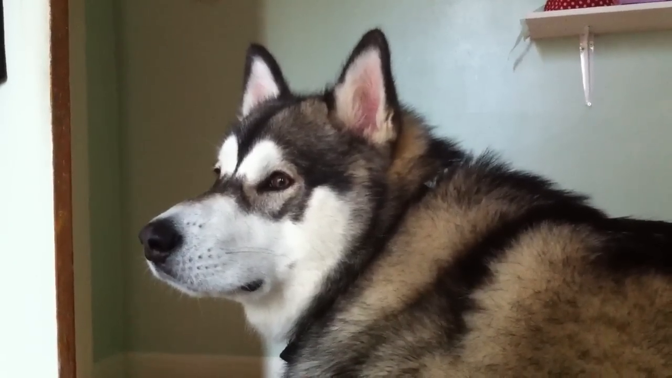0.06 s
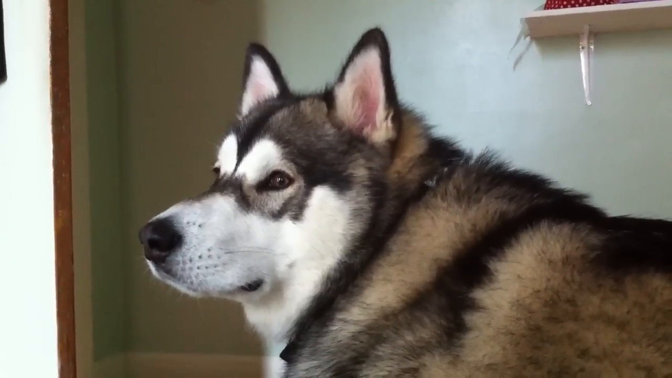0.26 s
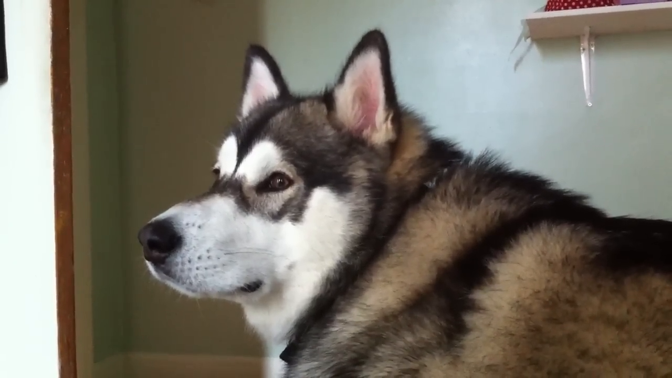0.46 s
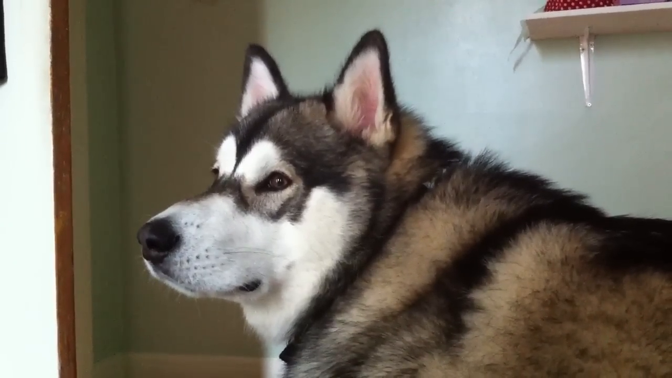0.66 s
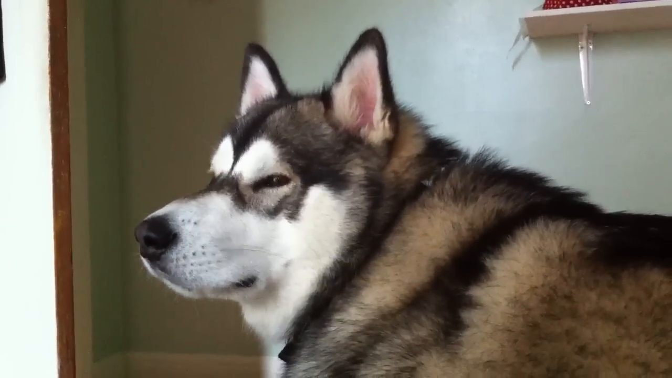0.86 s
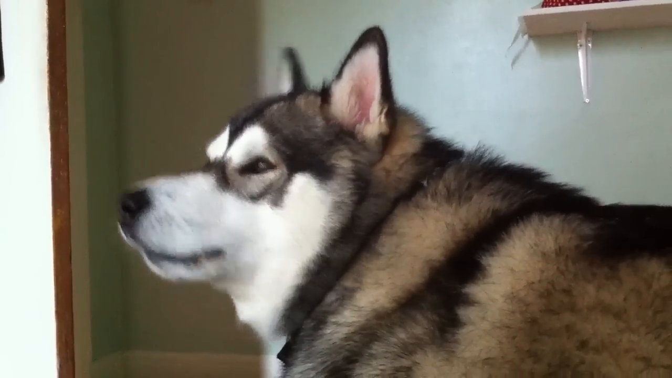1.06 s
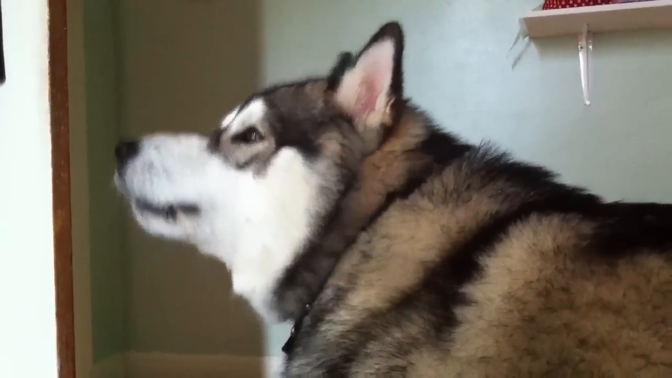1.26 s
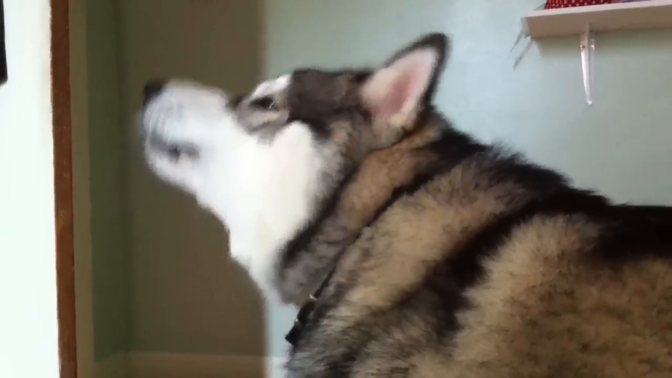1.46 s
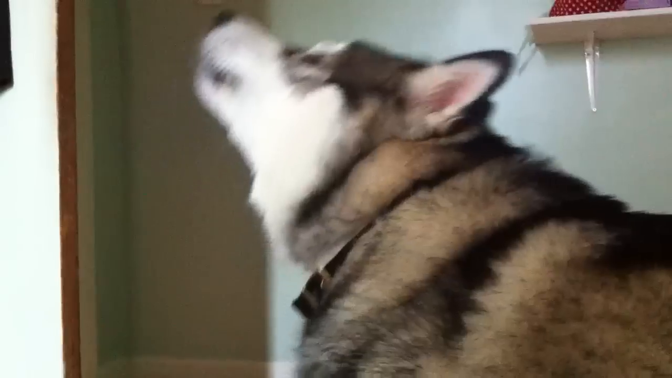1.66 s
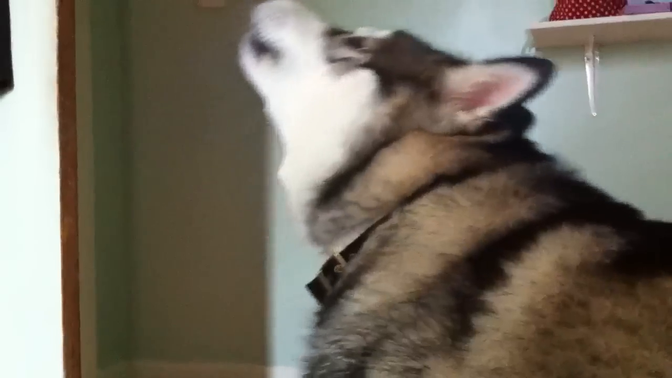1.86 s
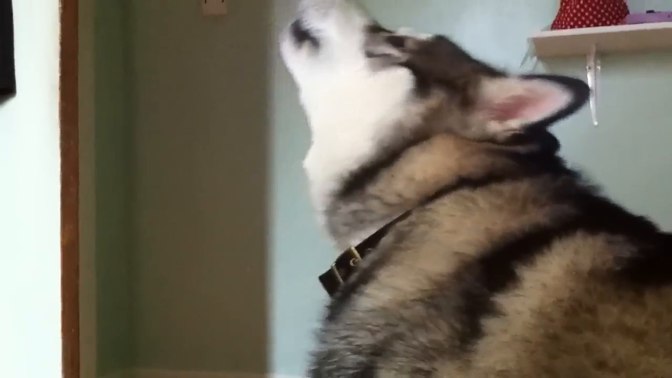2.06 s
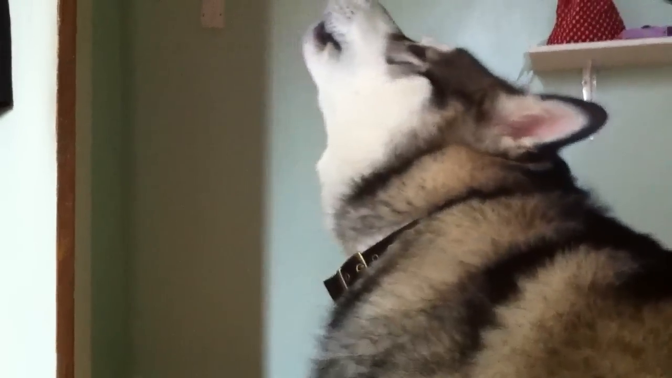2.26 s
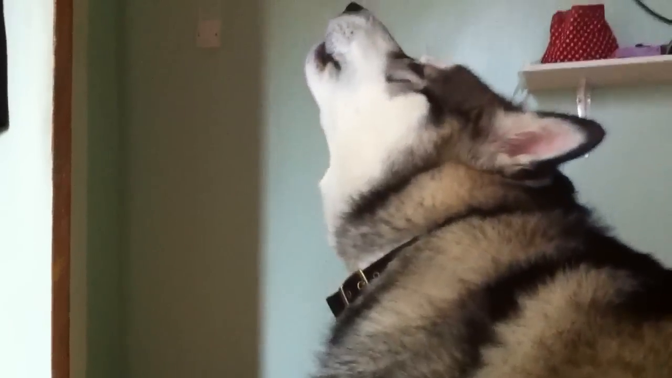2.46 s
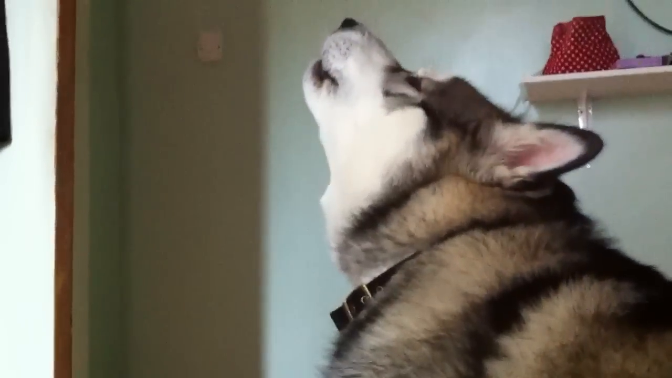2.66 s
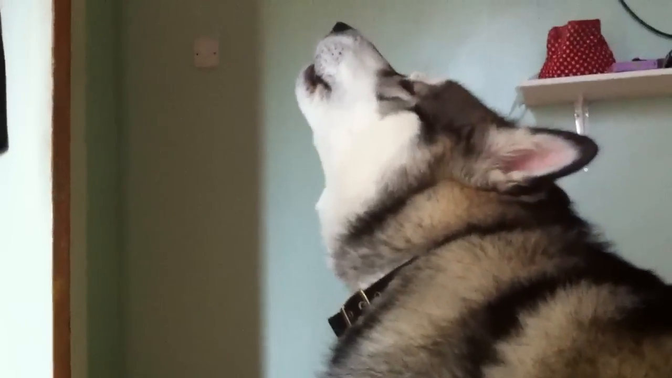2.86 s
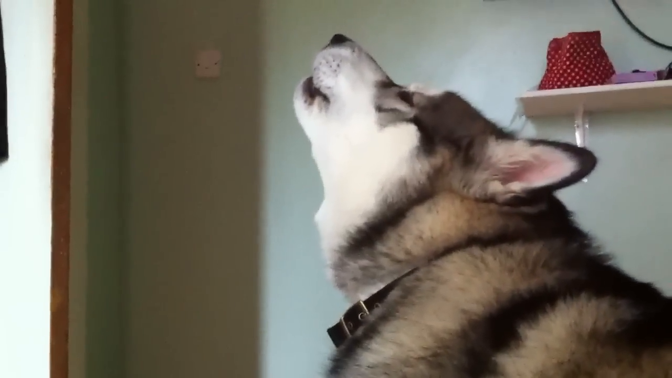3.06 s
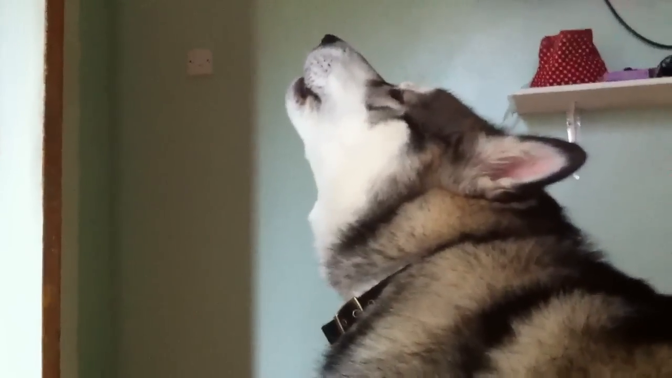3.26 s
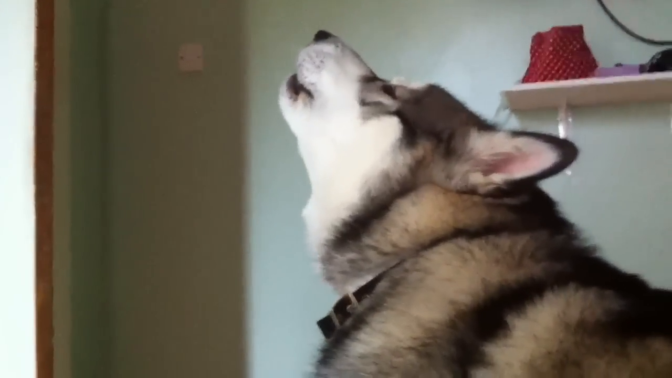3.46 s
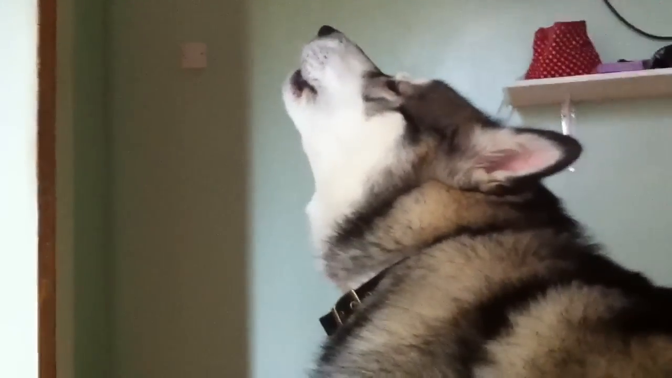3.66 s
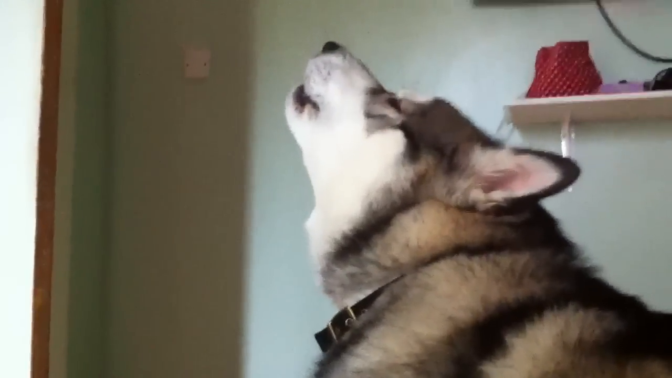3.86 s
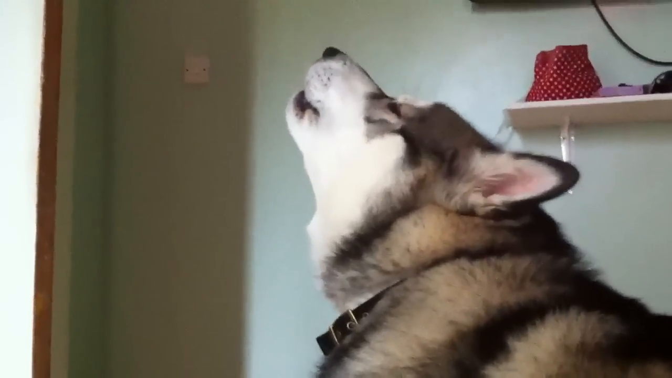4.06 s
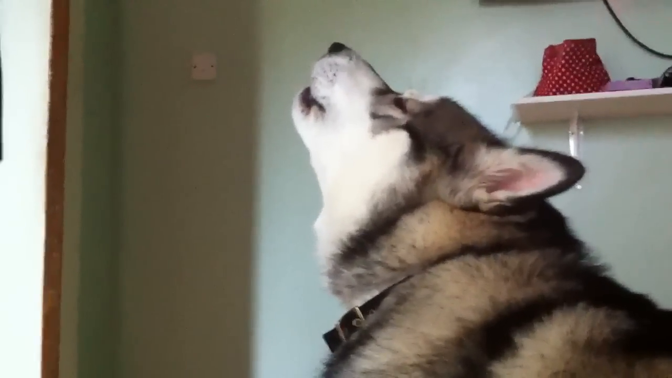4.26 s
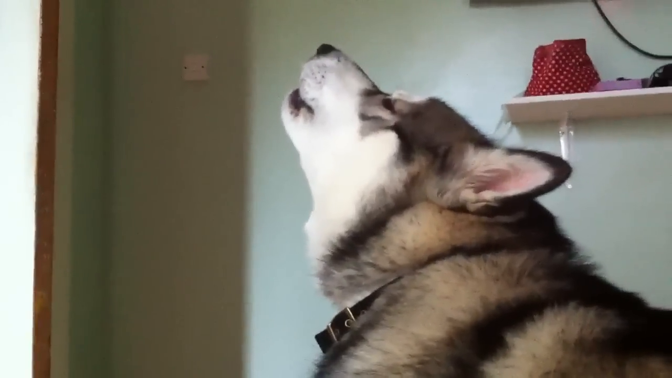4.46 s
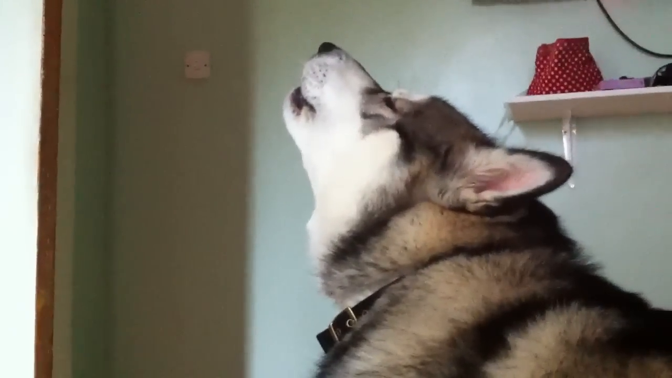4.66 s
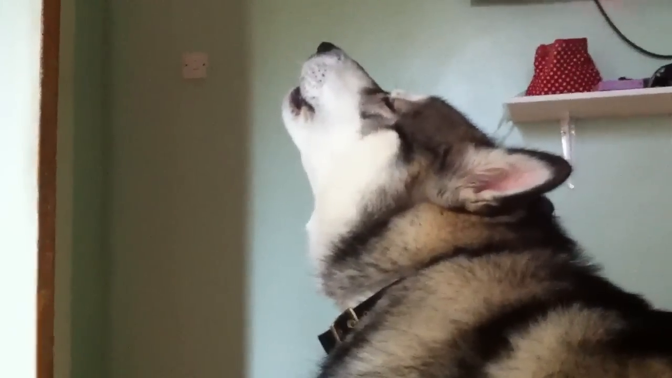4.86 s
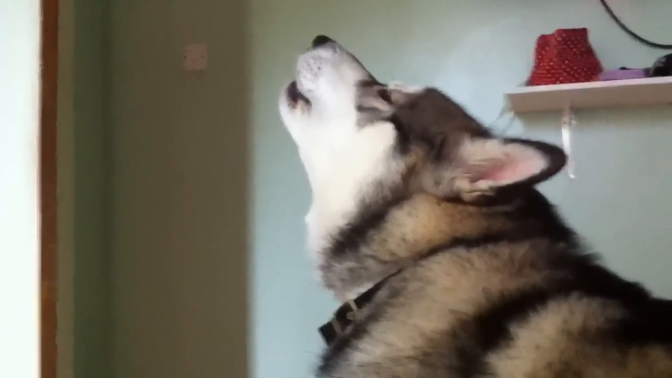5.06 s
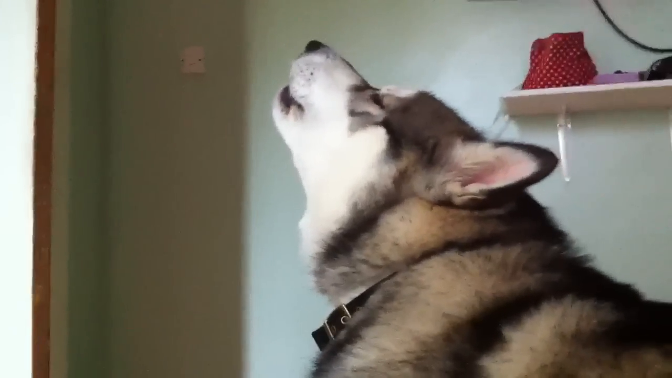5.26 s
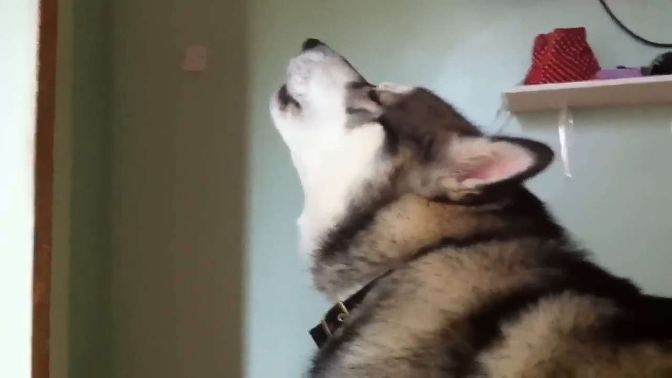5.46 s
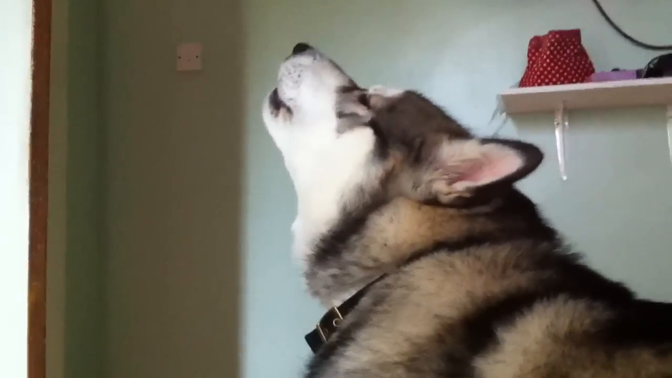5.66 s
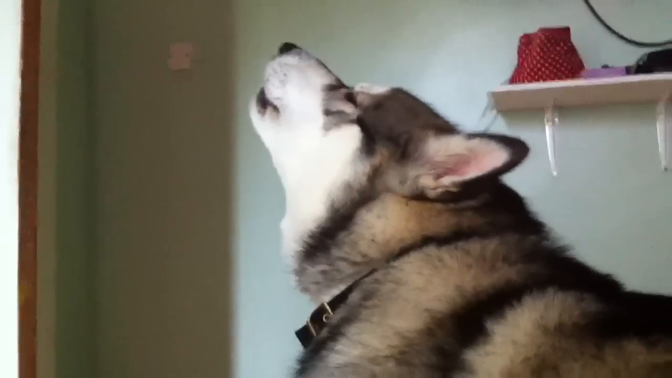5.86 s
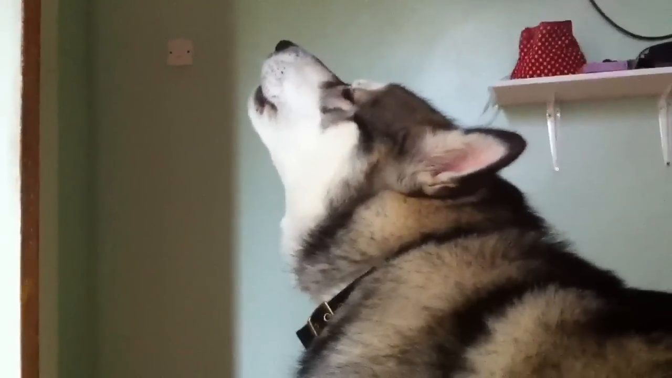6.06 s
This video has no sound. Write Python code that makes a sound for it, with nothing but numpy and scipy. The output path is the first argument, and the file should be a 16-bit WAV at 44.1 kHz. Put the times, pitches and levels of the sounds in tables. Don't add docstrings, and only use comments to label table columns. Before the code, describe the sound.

Close to the microphone in a small room, a large dog is quiet for a second, then smacks wet lips and gives a short creaky grunt. After a brief pause it howls once: a high tone swells, cracks down to a lower, rougher note, holds there with raspy flutters, then clears, slides down and fades. Breath rushes under the call; faint hiss and hum remain.

```python
import sys
import numpy as np
from scipy import signal
from scipy.fft import rfft, irfft
from scipy.io import wavfile
from scipy.ndimage import uniform_filter1d

SR = 44100
rng = np.random.default_rng(int(sys.argv[2]) if len(sys.argv) > 2 else 0)


def dump_mix(stems):
    frames = np.atleast_2d(stems).T
    limited = np.clip(frames, -1, 1)
    pcm = np.round(limited * 32767).astype(np.int16)
    wavfile.write(sys.argv[1], SR, pcm)


def volts_from_db(level):
    exponent = np.asarray(level, float) / 20
    return 10 ** exponent


N = 269451
TIME = np.arange(N) / SR

# [t/s, f/Hz]
HIGH_PITCH = [(1.48, 582.3), (1.51, 625.5), (1.53, 614.0), (1.638, 600.1), (1.72, 577.1), (1.902, 556.0),
              (2.102, 554.0), (2.34, 567.4), (2.485, 565.3)]
BREAK_PITCH = [(2.495, 480), (2.55, 462), (2.615, 448)]
LOCKED_PITCH = [(2.63, 423.5), (2.75, 422), (2.95, 407.8), (3.1, 406), (3.3, 408), (4.05, 407.3),
                (4.2, 406), (4.52, 406.4)]
SINKING_PITCH = [(4.59, 413.3), (4.95, 392.5), (5.27, 388), (5.36, 379), (5.64, 367.3), (5.72, 355),
                 (5.92, 346), (6.0, 336.5), (6.11, 334)]
# [t/s, level/dB, mouth opening/dB, throat squeeze/dB]
HIGH_EFFORT = [(1.47, -51, 7.5, -33), (1.49, -25, 9, -37), (1.58, -22.5, 14.5, -48), (1.635, -20, 7, -54),
               (1.68, -23.5, 10, -50), (1.75, -18, 0, -42), (1.97, -15, -6.5, -39.5),
               (2.1, -13.5, -7.5, -42), (2.38, -8.5, -18.5, -27.5)]
LOW_EFFORT = [(2.482, -11, -12, -34), (2.56, -10, -12.5, -25), (2.63, -13, 6, -28.5),
              (2.719, -15.5, 8.5, -26), (2.85, -11, 3, -29.5), (3.3, -12, 0.5, -25.5),
              (3.7, -10.5, -1.5, -28), (4.05, -10, 2, -21), (4.521, -10, 1, -26)]
SINKING_EFFORT = [(4.6, -8.5, 5, -27), (4.75, -10, 2, -31.5), (5.1, -12, 2.5, -40), (5.28, -15.5, 2.5, -38),
                  (5.45, -16.5, 1, -21.5), (5.64, -20, -0.5, -40), (5.72, -23.5, -5, -35),
                  (5.91, -23.5, -7, -37), (6.11, -38, 1.5, -23)]
# [f/Hz, level under the first harmonic/dB]
MOUTH = [(670, -9.5), (730, -16.5), (815, -17.5), (1000, -23.5), (1120, -11.5), (1220, -28.5),
         (1700, -19.5), (1850, -45.5)]
# [f/Hz, width/Hz, depth/dB]
CANCEL = [(335, 0.5, 6.5), (338.3, 1.5, 7.5), (358, 2.2, 2), (381, 3, 2), (401.4, 0.96, 2.5),
          (739, 9.7, 13), (795.6, 5, 19.5), (1163.4, 9.6, 7), (1213, 3.1, 18)]
# [t/s, level/dB]
LINGER = [(2.486, -32.5), (2.495, -25), (2.535, -27), (2.56, -20), (2.59, -30), (2.615, -29.5), (2.64, -53)]

# [t/s, its rate over the pitch]
LOCK = [
    (2.488, 1 / 2),
    (2.495, 3 / 5),
    (2.615, 7 / 11),
    (2.63, 2 / 3),
]
# [t/s, level/dB]
GRIP = [(2.27, -35), (2.33, -6), (2.48, -4), (2.65, -1), (3.4, 0), (4.53, 1.5), (4.63, -17), (4.75, -45.5)]
PARTNER_DB = [-36, -30, -24, -2]
# 1, 2, 3 and more pitches minus the line [level against their neighbours/dB]
WEAK_FAMILY_DB = [-32.5, -13.5, -6, -15]
# [t/s, depth/dB, length/ms]
SLIPS = [(2.493, 9, 4), (2.511, 18, 3.5), (2.523, 6, 2.8), (2.543, 17, 7), (2.562, 7, 7.2), (2.591, 22, 12),
         (2.614, 12, 14), (2.652, 9, 12), (3.04, 13, 5.5), (3.054, 7, 6.6), (3.101, 9, 4), (3.112, 20, 4),
         (3.128, 6, 6.5), (3.2, 18, 5.5), (3.27, 7, 4.9), (3.284, 6, 18), (3.336, 8, 4), (3.348, 16, 6.8),
         (3.362, 7, 5), (3.413, 18, 7.1), (3.432, 14, 5.6), (3.45, 16, 5.4), (3.465, 7, 5.6),
         (3.52, 26, 5.5), (3.535, 9, 5.8), (3.58, 18, 5.9), (3.601, 22, 6.6), (3.639, 6, 5.5),
         (3.677, 8, 11), (3.752, 16, 5.7)]
# [f/Hz, width/Hz, level/dB]
SLIP_RING = [(621, 29, -26), (766, 180, -33), (1080, 52, -30.5)]
# [from t/s, to t/s, jitter 0-1, rasp under the voice/dB]
STRAIN = [
    (1.444, 1.548, 0.3, -53),
    (2.478, 2.613, 0.27, -15.5),
    (3.008, 3.828, 0.15, -15.5),
]
STRAIN_RISE_S = [0.023, 0.021, 0.43]
STRAIN_FALL_S = [0.041, 0.04, 0.42]
# [f/Hz, width/Hz, level/dB]
RASP = [(286, 28, -10), (450, 160, -2.5), (658, 160, -6), (976, 200, -8.5), (1316, 13, -12),
        (1575, 140, -25), (2030, 160, -24)]

# [t/s, level/dB]
EDGE = [(1.5, -0.5), (1.75, -0.5), (2.0, -5.5), (2.3, 0), (2.55, -5.5), (2.93, -7), (3.02, -0.5), (4.6, 2),
        (5.45, 0)]
# [t/s, share 0-1]
HEAD_UP = [
    (2.0, 0.),
    (2.3, .45),
    (2.6, 1.),
]
# [f/Hz, width/Hz, level/dB]
THROAT_LOW = [(1483, 550, 5.5), (1949, 360, 4)]
THROAT_RISING = [(2210, 230, -11.5), (2816, 155, -2.5), (4464, 150, -12), (4840, 400, -9), (5720, 350, -12),
                 (6190, 160, -5), (8800, 900, -12)]
THROAT = [(2820, 300, -14.5), (3189, 146, 6), (3670, 160, -18), (5200, 350, -11.5), (5720, 98, -6.5),
          (6262, 710, -2), (8380, 290, -17), (11800, 990, -31.5)]

# [t/s, level/dB]
BREATH = [(0.9, -79), (1.05, -63), (1.108, -72), (1.175, -61.5), (1.25, -80.5), (1.44, -75.5), (1.49, -65),
          (1.78, -57), (2.02, -58), (2.17, -50.5), (2.46, -48), (2.52, -53), (3.47, -56.5), (4.55, -54),
          (4.8, -57), (5.33, -71), (5.7, -85.5)]
# [t/s, level over the breath/dB]
LEAK = [(1.17, -3), (1.3, -4), (1.6, 2), (1.72, -13), (2.0, -5.5), (2.12, 0.5), (2.5, 1.5), (4.1, -0.5),
        (4.6, -5), (5.7, 6.5)]
# [f/Hz, width/Hz, level/dB]
AIR_BANDS = [(8320, 1100, 4.5), (10200, 3500, -9), (12100, 1400, -0.5)]
THROAT_AIR_BANDS = [(1850, 620, 7), (2800, 390, -9.5), (3220, 840, 3), (4900, 1100, -6), (6350, 940, -0.5)]
# f/Hz, width/Hz
TEETH_BAND = (14000, 2200)
# [t/s, level over the air/dB]
TEETH = [(1.0, -5), (1.6, 0.5), (2.1, -7), (2.6, -4.5), (3.3, 5), (4.5, 1.5), (5.3, 2)]

# [t/s, peak level/dB, chest level/dB]
GRUNT = [(1.032, -51, 8), (1.058, -53, 6), (1.127, -24.5, -2.5), (1.144, -30, 0), (1.157, -22.5, 5.5),
         (1.174, -26.5, 4.5), (1.194, -39, 14), (1.214, -47, -5)]
# [f/Hz, width/Hz, level/dB]
GRUNT_MOUTH = [(446, 140, -4), (1010, 92, -7.5), (1430, 380, -24), (2900, 690, -30), (4260, 1770, -32)]
GRUNT_CHEST = [(151, 69, -4.5), (239, 105, -3.5)]
# [t/s, peak level/dB]
SPIT = [(0.9607, -60.5), (1.0344, -40.5), (1.057, -40.5), (1.1443, -43), (1.1717, -49), (3.0734, -38),
        (3.0854, -32.5), (3.272, -40), (3.5884, -49), (4.7546, -39), (4.7714, -42)]
# [t/s, peak level/dB]
GULPS = [(2.048, -50), (2.168, -54), (2.53, -40)]
# [t/s, level/dB]
GRUNT_AIR = [(0.93, -75), (1.044, -59), (1.108, -53), (1.13, -44), (1.195, -44.5), (1.26, -72),
             (1.352, -60.5), (1.44, -87.5)]
# [f/Hz, level per Hz/dB]
HISS = [(49, -44), (140, -14.5), (216, -6), (323, -14), (1710, -21.5), (7540, -25.5), (12200, -28.5),
        (15600, -20.5)]


def curves(table, silent_db=-120):
    s, *columns = np.transpose(table)
    return [np.interp(TIME, s, c, left=silent_db if c[0] < -20 else None) for c in columns]


def curve(table):
    return curves(table)[0]


def unit(x):
    return x / np.sqrt(np.mean(x ** 2))


def noise():
    return rng.standard_normal(N)


def wander(rate_hz):
    return unit(signal.lfilter(*signal.butter(2, rate_hz, fs=SR), noise()))


def spin(hz):
    return np.exp(2j * np.pi * np.cumsum(hz) / SR)


def ring(x, hz, width_hz, count=1):
    for _ in range(count):
        x = signal.lfilter(*signal.iirpeak(hz, hz / width_hz, fs=SR), x)
    return x


def body(x, modes, count=1):
    out = 0
    for k, (hz, width_hz, db) in enumerate(modes):
        out = out + (-1) ** k * volts_from_db(db) * ring(x, hz, width_hz, count)
    return out


def howl():
    hz = curve(list(HIGH_PITCH) + list(BREAK_PITCH) + list(LOCKED_PITCH) + list(SINKING_PITCH))
    effort = list(HIGH_EFFORT) + list(LOW_EFFORT) + list(SINKING_EFFORT)
    effort_db, mouth_db, squeeze_db = curves(effort)
    first_db = effort_db - cancel_db(hz)
    coupled = (TIME > GRIP[0][0]) & (TIME < GRIP[-1][0])
    jitter, rasp_gain = strain(first_db)
    slip = slips()
    early = np.roll(slip, -SR // 600)
    hunt = unit(ring(noise(), 40, 22))
    throb = unit(ring(noise(), 40, 22))
    steady_hz = hz * (1 + 0.00072 * wander(9.8) + 0.046 * jitter * hunt)
    folds = spin(steady_hz * (1 - 0.036 * slip))
    flip = spin(steady_hz / hz * 605)
    partner = spin(steady_hz * curve(LOCK))
    loose_db = -13 * np.interp(TIME, [LOCK[0][0], LOCK[-1][0]], [1, 0])

    first = volts_from_db(first_db + 0.79 * jitter) * ((1 - slip) * folds + volts_from_db(-1.5) * early ** 2 * flip)
    second_db = effort_db + mouth_db + overtone_db(2 * hz) - cancel_db(2 * hz)
    third_db = effort_db + mouth_db + overtone_db(3 * hz) - cancel_db(3 * hz)
    low = first + 1j * volts_from_db(second_db) * folds ** 2 - volts_from_db(third_db) * folds ** 3
    low = low + lingering(throb)
    tones = (low + coupled * partner_tones(folds, partner, loose_db)).real
    voiced = volts_from_db(0.5 * jitter * throb) * tones
    closure = closure_buzz(hz, folds, partner, coupled, loose_db)
    upper = upper_throat(closure, effort_db + squeeze_db, coupled)
    voice = voiced + upper + rasp(rasp_gain, slip, early) + knock(early) + air(folds.real)
    return np.sqrt(2) * signal.sosfilt(signal.butter(4, 135, "high", fs=SR, output="sos"), voice)


def overtone_db(hz):
    at_hz, db = np.transpose(MOUTH)
    return np.interp(np.log(hz), np.log(at_hz), db)


def cancel_db(hz):
    loss_db = 0
    for at_hz, width_hz, depth_db in CANCEL:
        loss_db = loss_db + depth_db * np.exp(-.5 * ((hz - at_hz) / width_hz) ** 2)
    return loss_db


def lingering(throb):
    tone = np.exp(2j * np.pi * 572 * TIME)
    return volts_from_db(curve(LINGER) + 2.4 * throb) * tone * (TIME < LINGER[-1][0])


def partner_tones(folds, partner, loose_db):
    own_db, sum1_db, sum2_db = (curve(GRIP) + db for db in PARTNER_DB[:3])
    before_db = -6 * (TIME < LOCK[0][0])
    settling_db = 14 * np.minimum(TIME - 4.08, 0)
    sum2_db = sum2_db + loose_db + before_db + settling_db
    own, sum1, sum2 = volts_from_db(own_db), volts_from_db(sum1_db), volts_from_db(sum2_db)
    weak = volts_from_db(WEAK_FAMILY_DB)
    sums = (own + sum1 * folds + sum2 * folds ** 2) * partner
    differences = weak[0] * own * folds + weak[1] * sum1 * folds ** 2 + weak[2] * own * folds ** 3
    return sums + differences / partner


def closure_buzz(hz, folds, partner, coupled, loose_db):
    comb, power = 0, folds ** 3
    for k in range(4, 37):
        power = power * folds
        flicker = uniform_filter1d(rng.standard_normal(N // 64 + 1), size=40)
        flicker = np.repeat(flicker, 64)[:N]
        gain = volts_from_db((min(k, 8) * 3.61 - 3.8 * coupled) * flicker) * (k * hz < 15000)
        comb = comb + power * gain * np.exp(2j * np.pi * rng.random())
    share = volts_from_db(curve(GRIP) + PARTNER_DB[3] + loose_db)
    stamp = 1 + coupled * share * (partner / folds + volts_from_db(WEAK_FAMILY_DB[3]) / partner)
    return (comb * stamp).real


def upper_throat(closure, middle_db, coupled):
    head_up = np.clip(curve(HEAD_UP), 0, 1)
    lifted = head_up * body(closure, THROAT, count=3)
    rising = (1 - head_up) * volts_from_db(2.0) * body(closure, THROAT_RISING, count=2)
    upper_db = curve(BREATH) + 10 + curve(EDGE) - 60 * (TIME < HIGH_EFFORT[0][0])
    lowest = volts_from_db(-6 * coupled) * body(closure, THROAT_LOW[:1], count=3)
    middle = lowest - body(closure, THROAT_LOW[1:], count=3)
    return volts_from_db(upper_db - 5.5) * (lifted + rising) + volts_from_db(middle_db - 10.0) * middle


def slips():
    out = np.zeros(N)
    for s, depth_db, ms in SLIPS:
        out += (1 - volts_from_db(-depth_db)) * np.exp(-.5 * ((TIME - s) / (0.00045 * ms)) ** 2)
    return np.clip(out, 0, .97)


def strain(level_db):
    jitter = 0.036
    gain = volts_from_db(curve(BREATH) + .8 * curve(LEAK) + 6.5) * (TIME > STRAIN[0][0])
    for (start, end, rough, rasp_db), rise, fall in zip(STRAIN, STRAIN_RISE_S, STRAIN_FALL_S):
        spell = np.interp(TIME, [start - rise, start, end, end + fall], [0, 1, 1, 0])
        jitter = jitter + rough * spell
        gain = gain + volts_from_db(level_db + rasp_db) * spell ** 2
    return jitter, gain


def rasp(gain, slip, early):
    swell = 1 + 1.9 * uniform_filter1d(np.roll(early, -SR // 250), size=400)
    puffs = noise() * volts_from_db(1.0 * wander(30)) * swell
    return gain * (1 - 0.29 * slip) * unit(body(puffs, RASP, count=2))


def knock(early):
    return body(np.roll(early, -SR // 250) * noise() * 18, SLIP_RING, count=2)


def air(cycle):
    mouth = unit(body(noise(), AIR_BANDS, count=2)) * volts_from_db(2.6 * wander(6))
    teeth = unit(ring(noise(), *TEETH_BAND, count=2)) * volts_from_db(curve(TEETH) + 1.2 * wander(6))
    throat = unit(body(noise(), THROAT_AIR_BANDS, count=2)) * volts_from_db(curve(LEAK) + 0.6 * wander(13))
    return ((mouth + teeth) * volts_from_db(-6) + throat) * volts_from_db(curve(BREATH)) * (1 + .25 * cycle)


def grunt():
    mouth = strike([(s, db - 3.5) for s, db, _ in GRUNT], GRUNT_MOUTH)
    chest = strike([(s, db + chest_db - 13.5) for s, db, chest_db in GRUNT], GRUNT_CHEST)
    ticks = strike(SPIT, [(9000, 3000, 0.032), (11620, 3000, 0.014)])
    gulps = strike(GULPS, [(170, 94, 0)])
    return mouth + chest + ticks + gulps + rustle()


def strike(events, modes):
    click, train = np.zeros(4096), np.zeros(N)
    click[0] = 1
    shape = body(click, modes, count=2)
    for s, db in events:
        train[int(s * SR)] = volts_from_db(db)
    return signal.fftconvolve(train, shape / np.abs(shape).max())[:N]


def rustle():
    rub = body(noise(), [(298, 720, -1.5), (920, 820, 1.5), (1930, 9900, -15)], count=2)
    rub = unit(rub) * volts_from_db(3.4 * wander(70))
    return rub * volts_from_db(curve(GRUNT_AIR) - 4) * (TIME < GRUNT_AIR[-1][0])


def room(x):
    t = TIME[:SR // 2]
    fade = volts_from_db(-60 * t / .3)
    tail = rng.standard_normal(len(t)) * fade * (t > .004)
    tail = signal.lfilter([1], [1, -.6], tail)
    return x + volts_from_db(-24) * signal.fftconvolve(x, tail / np.sqrt(np.sum(tail ** 2)))[:N]


def hum():
    return volts_from_db(-78) * unit(ring(noise(), 212, width_hz=8))


def hiss():
    hz = np.maximum(np.arange(N // 2 + 1) * SR / N, 1)
    at_hz, db = np.transpose(HISS)
    colour = volts_from_db(np.interp(np.log(hz), np.log(at_hz), db))
    return volts_from_db(-64) * unit(irfft(rfft(noise()) * colour, N))


def scene():
    return (room(howl() + grunt()) + hum())[None]


def low_pass(x):
    return signal.sosfilt(signal.butter(12, 15750, fs=SR, output="sos"), x)


def record(dry):
    rounded = 1.3 * np.tanh(dry / 1.3)
    thin = signal.sosfilt(signal.butter(3, 105, "high", fs=SR, output="sos"), rounded)
    return low_pass(thin + hiss())


dry = scene()
out = record(dry)
dump_mix(out)
```